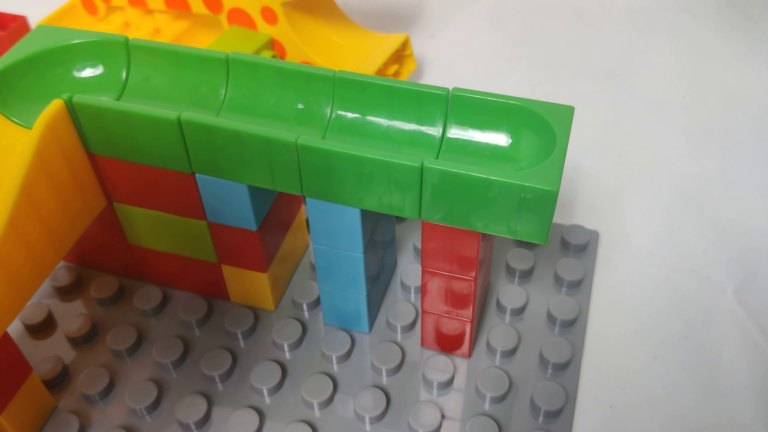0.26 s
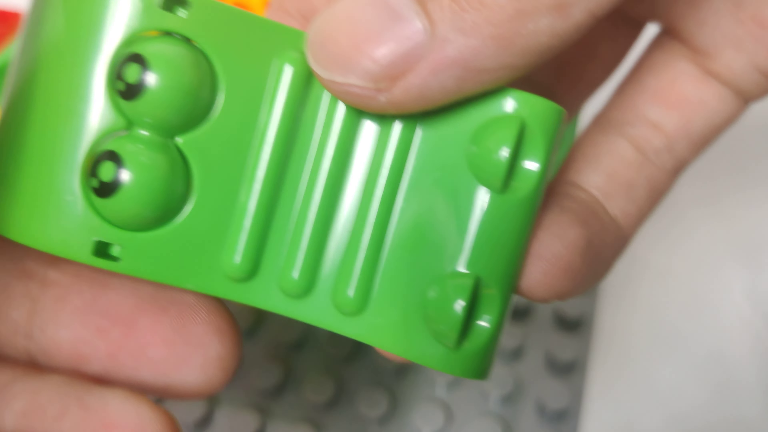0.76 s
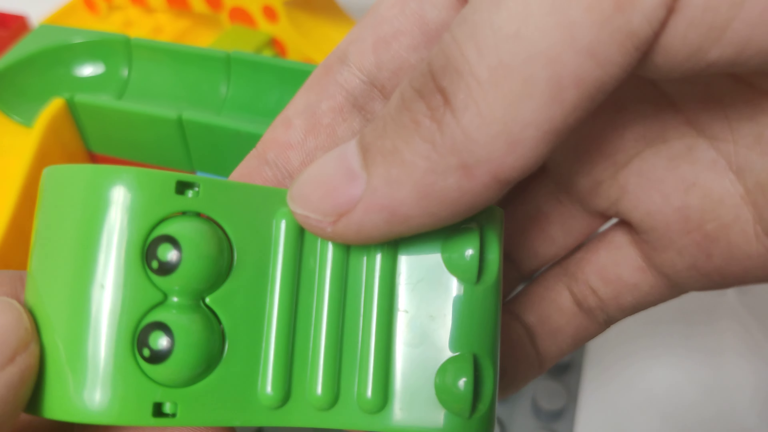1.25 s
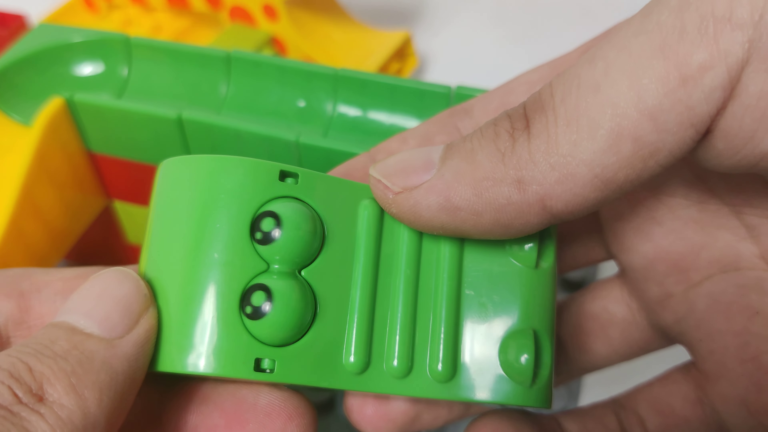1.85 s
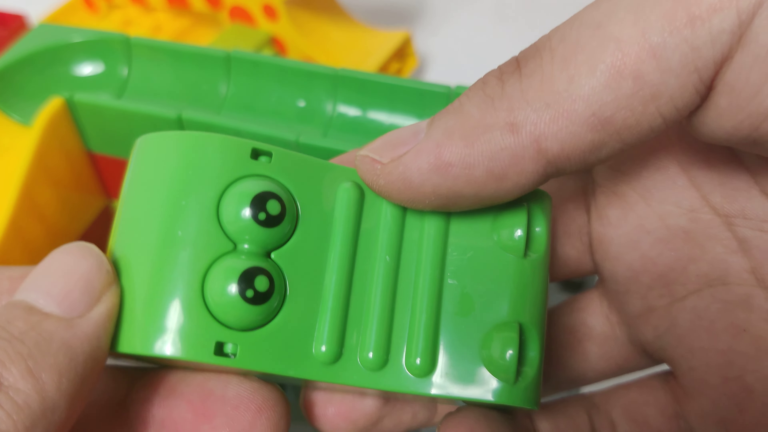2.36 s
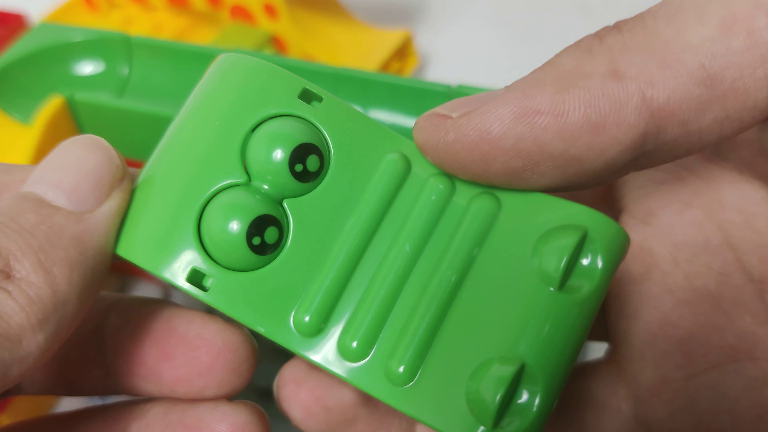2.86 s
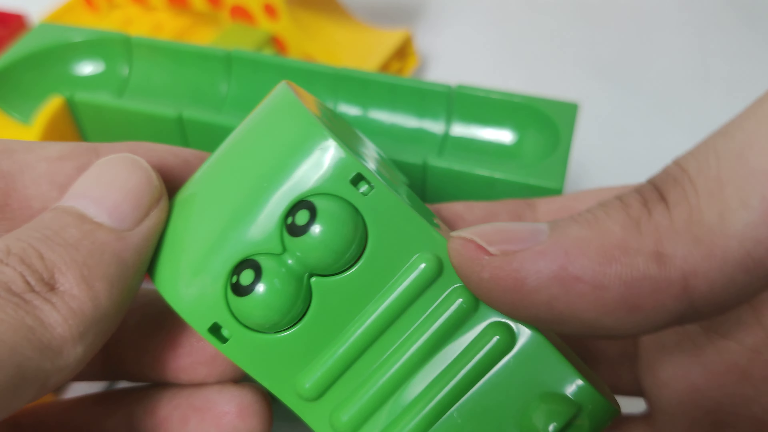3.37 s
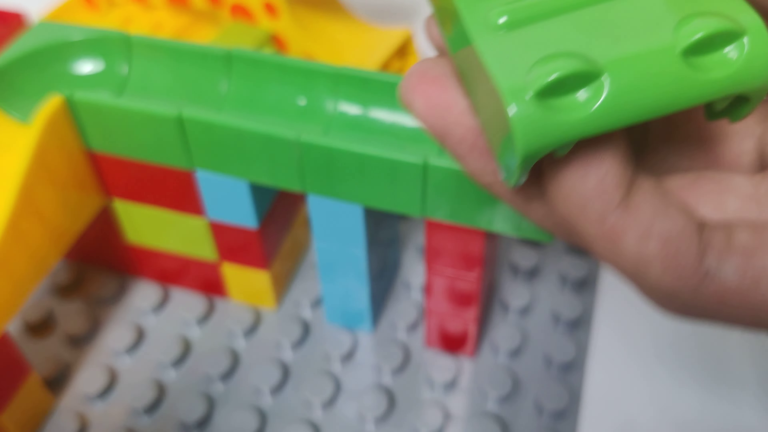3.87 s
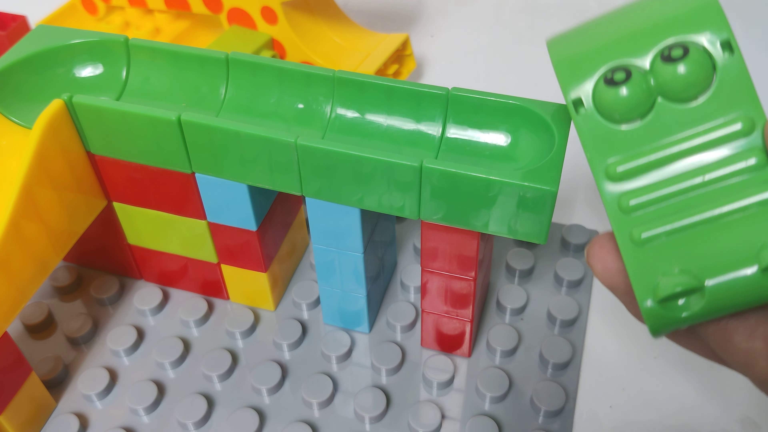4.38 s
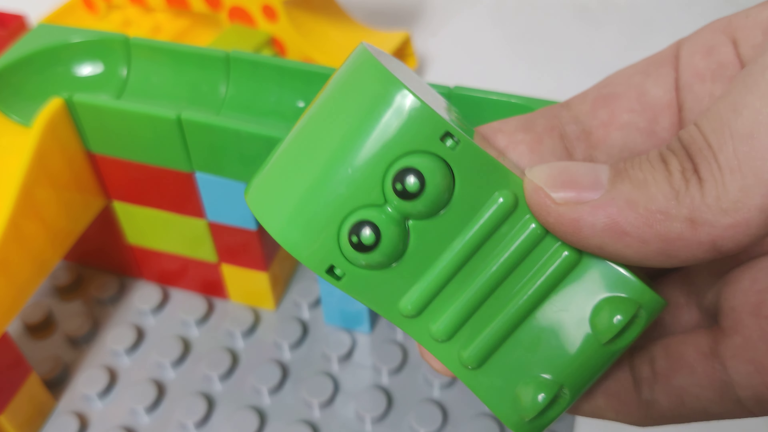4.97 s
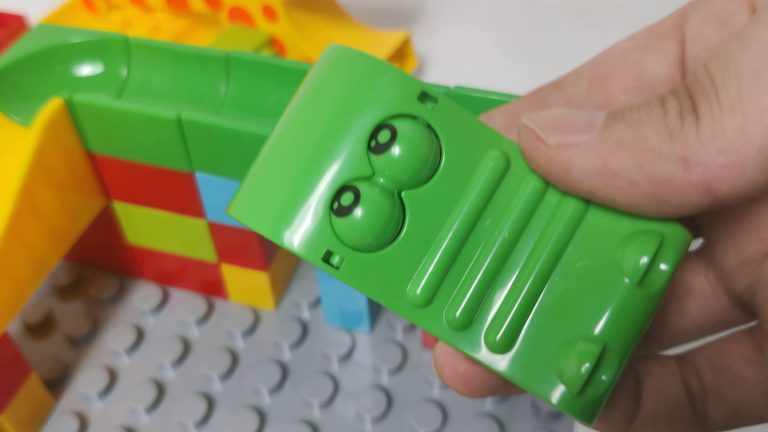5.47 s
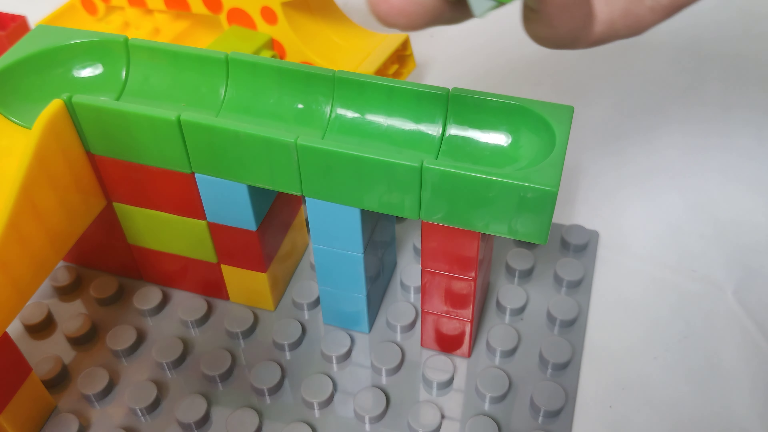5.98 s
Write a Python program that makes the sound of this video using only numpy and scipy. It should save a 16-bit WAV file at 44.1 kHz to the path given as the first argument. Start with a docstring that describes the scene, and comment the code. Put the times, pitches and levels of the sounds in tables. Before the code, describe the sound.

Light plastic ticks, clacks and short skids come in irregular clusters over soft fingertip rubs and a very quiet low room hum.

```python
"""Plastic blocks in a hard room

Hands turn a hollow plastic toy piece and try it against a track of building blocks. Edges tick and skid:
stick-slip jerks excite the damped modes of the thin shell. Fingertips rub it as grains of filtered noise;
nudges of the table are damped low swings. A small hard room, made of decaying noise, answers the sounds
over a faint hum and rumble."""
import sys
import numpy as np
from scipy import signal
from scipy.fft import rfft, irfft
from scipy.io import wavfile
from scipy.ndimage import uniform_filter1d

SR = 44100
rng = np.random.default_rng(int(sys.argv[2]) if len(sys.argv) > 2 else 0)


def transcribe(signal):
    """Save signal, clipped to [-1, 1], as a 16-bit WAV file at the path in sys.argv[1]."""
    frames = np.atleast_2d(signal).T
    limited = np.clip(frames, -1, 1)
    pcm = np.round(limited * 32767).astype(np.int16)
    wavfile.write(sys.argv[1], SR, pcm)


N = 274743  # samples


def gain_of(db):
    """Decibel law: level to amplitude."""
    return 10 ** (np.asarray(db) / 20)


def evened(x):
    """Normalisation of power: scales to rms 1."""
    return x / np.sqrt(np.mean(x ** 2) + 1e-20)


def read(points, hz):
    """Interpolation on a logarithmic frequency axis."""
    f, value = np.transpose(points)
    return np.interp(np.log(hz + 1), np.log(f + 1), value)


def coloured(x, points):
    """Linear filtering: multiplies the spectrum of x by the gains of the points (f/Hz, level/dB)."""
    size = x.shape[-1]
    gain = gain_of(read(points, np.fft.rfftfreq(size, 1 / SR)))
    return irfft(rfft(x) * gain, size)


def panned(db):
    """Interaural level difference: left and right gains of mean power 1."""
    return evened(gain_of([[db / 2], [-db / 2]]))


def add(mix, s, sound):
    """Superposition: mixes a sound of several channels in at time s."""
    part = mix[:, max(round(s * SR), 0):][:, :sound.shape[1]]
    part += sound[:, :part.shape[1]]


# spectrum of the room air: f/Hz, relative level/dB
AIR_SPECTRUM = [(20, 0.5), (45, -3.5), (70, -7.5), (110, -11.5), (180, -15), (260, -16), (400, -19.5),
                (700, -24), (1500, -26.5), (3000, -27.5), (6000, -28), (8000, -36), (12000, -35),
                (16000, -37.5)]
# correlation of the air noise between left and right: f/Hz, likeness
AIR_LIKENESS = [(30, 0.68), (150, 0.52), (400, 0.32), (1000, 0.07), (4000, 0.0336)]
# partials of the appliance hum: f/Hz, level/dB
HUM_PARTIALS = [(47, -69), (139.5, -71), (231, -79)]
AIR_DB = -58.5


def background(waver=0.55, left_db=1.0):
    """Partly coherent noise, most alike in both ears in the bass, and the wavering hum of some appliance."""
    a, b = rfft(rng.standard_normal((2, N)))
    same = np.clip(read(AIR_LIKENESS, np.fft.rfftfreq(N, 1 / SR)), -1, 1)
    right = same * a + np.sqrt(1 - same ** 2) * b
    air = evened(coloured(irfft(np.array([a, right]), N), AIR_SPECTRUM))
    t = np.arange(N) / SR
    knots = np.linspace(0, t[-1], 60)
    hum = 0
    for hz, db in HUM_PARTIALS:
        wander = rng.standard_normal(len(knots)) + 1j * rng.standard_normal(len(knots))
        drift = np.interp(t, knots, 1 + waver * wander)  # wavers in strength and phase
        hum = hum + gain_of(db) * evened((drift * np.exp(2j * np.pi * hz * t)).real)
    return panned(left_db) * (gain_of(AIR_DB) * air + hum)


# reverberation time of the room: f/Hz, t60/s
REVERBERATION = [(200, 0.95), (1000, 1), (3000, 0.87), (6000, 0.59), (9000, 0.55), (15000, 1)]


def room(x, gap=0.0048, early_db=16.0, early_s=0.013):
    """Diffuse reverberation: dense reflections of one direction, each band dying at its own speed."""
    hz, t, z = signal.stft(rng.standard_normal((2, SR)), SR, nperseg=256)
    decay = gain_of(-60 * t / read(REVERBERATION, hz)[:, None])
    tail = signal.istft(z * decay, SR, nperseg=256)[1]
    t = np.arange(tail.shape[1]) / SR
    onset = np.clip(t / gap - 1, 0, 1)  # silent for one gap (s), then rises over another
    tail = tail * onset * gain_of(early_db * np.exp(-t / early_s))  # early reflections are raised
    return signal.fftconvolve(x[None], tail / np.linalg.norm(tail[0]), axes=1)[:, :N]


# soft blows through the table: t/s, f/Hz, peak level/dB before panning, rise time/s, relative room share
TABLE_BLOWS = [(0.646, 45.8, -44.5, 0.019, 0.11), (1.785, 51.7, -44.5, 0.018, 0.2),
               (4.254, 239, -48.5, 0.0042, 1.24), (4.255, 375, -53, 0.0011, 2.3),
               (4.253, 670, -40, 0.00026, 1.7), (4.455, 189.7, -54, 0.0037, 0.56),
               (4.772, 50.7, -40.5, 0.0048, .1), (4.827, 41, -38, 0.024, 0.23),
               (4.84, 93, -48.5, 0.017, 0.41)]


def table(pan_db=5.0):
    """Damped oscillation of the table top; returns the swings and the part that goes to the room."""
    near, far = np.zeros((2, N)), np.zeros((2, N))
    t = np.arange(SR // 2) / SR
    for s, hz, db, rise, share in TABLE_BLOWS:
        envelope = (t / rise * np.exp(1 - t / rise)) ** 2  # peaks at 1 when t = rise
        swing = gain_of(db) * envelope * np.cos(2 * np.pi * hz * t) * panned(pan_db)
        add(near, s, swing)
        add(far, s, share * swing)
    return near, far


# fingertip strokes: t/s, length/s, level/dB before fades, wall ring/dB, rib ring/dB
RUB_STROKES = [(0.593, 0.26, -66.5, -15, 2), (0.901, 0.04, -60, 0, -1), (1.005, 0.27, -60, -10, 1.5),
               (1.379, 0.44, -64.5, -1, -2), (1.721, 0.14, -66, -5, 28), (2.107, 0.18, -65, -17, -7),
               (2.48, 0.28, -60.5, 3, 2), (2.902, 0.14, -59, 5, -3), (3.24, 0.11, -62, -18, -8),
               (3.562, 0.28, -61.5, -6, 2), (4.097, 0.22, -60.5, 3.5, -1), (4.395, 0.091, -51, 7.5, -6),
               (4.986, 0.1, -65, 0, 2), (5.234, 0.055, -55.5, 0, 1), (5.539, 0.24, -62, 2, 4),
               (5.779, 0.14, -57, 3, -2), (5.98, 0.15, -72, 0, 0)]
# spectrum of rubbed plastic: f/Hz, relative level/dB
RUB_SPECTRUM = [(200, -28.5), (1000, -12), (1900, -13.5), (2850, 2), (3400, -13), (4100, 0.5),
                (4900, -11.5), (5850, 3), (6600, -7.5), (7600, -19), (16000, -22.5)]
# the two resonances that a rubbing finger brings out; the width is to half the dB boost on each side
WALL_HZ, RIB_HZ, RING_WIDTH_HZ = 2760, 4080, 300


def fingers(grain_db=1.5, grains_per_s=4000, pan_db=3.0, uneven_db=3.0, uneven_s=0.015):
    """Granular friction: skin catches in many small grains under an uneven pressure, fading at both ends."""
    out = np.zeros((2, N))
    for s, length, db, wall_db, rib_db in RUB_STROKES:
        size = round(length * SR)
        grain_gain = gain_of(grain_db * np.minimum(rng.exponential(1, SR), 5))
        grains = grain_gain * (rng.random(SR) < grains_per_s / SR)
        unevenness = uniform_filter1d(rng.standard_normal(SR), round(uneven_s * SR))
        pressure = gain_of(uneven_db * evened(unevenness))
        catches = (pressure * grains * rng.standard_normal((2, SR)))[:, :size]
        hz = np.fft.rfftfreq(size, 1 / SR)
        wall, rib = (1 / (1 + ((hz - centre) / RING_WIDTH_HZ) ** 2) for centre in (WALL_HZ, RIB_HZ))
        colour = gain_of(read(RUB_SPECTRUM, hz) + wall_db * wall + rib_db * rib)
        hiss = evened(irfft(rfft(catches) * colour, size))
        add(out, s, gain_of(db) * panned(pan_db) * hiss * signal.windows.tukey(size, .5))
    return out


# stray ticks of the piece shifting in the grip: level above the rubbing, its spread, depth, spread of colour
STRAY_OVER_DB, STRAY_SPREAD_DB, STRAY_DEPTH_DB, STRAY_COLOUR_DB = 5, 1.5, 2.5, 3


def strays(count=17, skid_s=0.00164, pan_db=7.5):
    """Random point process: faint contacts while the fingers slide; rows as in EDGE_CONTACTS."""
    start, length, db = np.transpose(RUB_STROKES)[:3, np.arange(count) % len(RUB_STROKES)]
    moment = start + length * rng.random(count)
    rows = []
    for s, rub_db, (force, deep, hard) in zip(moment, db, rng.standard_normal((count, 3))):
        level_db = rub_db + STRAY_OVER_DB + STRAY_SPREAD_DB * force
        depth_db = STRAY_DEPTH_DB + STRAY_COLOUR_DB * deep
        rows.append((s, skid_s, level_db, pan_db, depth_db, STRAY_COLOUR_DB * hard))
    return rows


# modes of the plastic shell, before detuning and spot: f/Hz, relative level/dB, t60/s
SHELL_MODES = [(1252, -11.5, 0.013), (2210, -15, 0.0066), (2520, -9, 0.021), (2941, 2, 0.02),
               (3713, -1.5, 0.019), (4110, 3, 0.022), (4590, -9.5, 0.017), (5720, 8, .022),
               (5956, 10, 0.016), (6350, -4, 0.037), (8040, -12, 0.0079), (9530, -27, 0.0091)]
# dense, quickly damped modes between them: f/Hz, relative level/dB
CLATTER_SPECTRUM = [(150, -38.5), (500, -24), (850, -13), (1250, -26), (1620, -19.5), (2150, -12),
                    (3200, -3.5), (4800, -6.5), (5800, 12.5), (6700, -9), (7600, -16), (10000, -22),
                    (11500, -29), (16000, -37)]
DIRECTIONS = 6  # two microphones and four paths towards the walls


def shell(t, clatter_t60=0.024, snap_db=9.5, snap_s=0.00033, spot_db=3.5, grip=0.0088, rise=0.00029):
    """Modal superposition: the piece's answer to one snap, microphones first, then towards the walls."""
    hz, db, t60 = np.transpose(SHELL_MODES)[:, :, None]
    hz = hz * (1 + grip * rng.standard_normal(hz.shape))  # the grip detunes the modes
    db = db + spot_db * rng.standard_normal(db.shape)  # each spot favours other modes
    facing = np.exp(2j * np.pi * rng.random((DIRECTIONS, len(SHELL_MODES))))  # phase by direction
    modes = gain_of(db - 60 * t / t60) * np.exp(2j * np.pi * hz * t)
    ring = (facing @ modes).real
    clatter = coloured(rng.standard_normal((DIRECTIONS, len(t))), CLATTER_SPECTRUM)
    clatter *= gain_of(snap_db * np.exp(-t / snap_s) - 60 * t / clatter_t60)  # extra level at the snap
    return (evened(ring) + evened(clatter)) * (1 - np.exp(-t / rise))


LEAD_S = .002  # room before the contact for the two-way filters


def contact(bands, skid, level_db, colour_db, slips_per_s=2500, slip_size=0.67, catch_s=0.033):
    """Stick-slip excitation: an edge catches, then slips in jerks; its place sets each register's level."""
    t = np.arange(2048) / SR
    pressure = np.sin(np.pi * np.minimum(t / max(skid, 1 / SR), 1))
    slips = rng.standard_normal(len(t)) * (rng.random(len(t)) < slips_per_s / SR)
    jerks = slip_size * pressure * slips
    jerks[0] = np.exp(-skid / catch_s)  # a long, glancing skid starts softly
    jerks = np.roll(jerks, round(LEAD_S * SR))
    sound = signal.fftconvolve(shell(t), jerks[None], axes=1)[:, :len(t)]
    out = 0
    for band, db in zip(bands, colour_db):
        out = out + gain_of(db) * evened(signal.sosfiltfilt(band, sound, padtype=None))
    energy = (out ** 2).sum(1, keepdims=True)
    return gain_of(level_db) * out * np.sqrt(SR / 100 / energy)  # level refers to 10 ms


# edges of plastic meeting: t/s, skid length/s, level/dB over 10 ms before panning, left-right/dB,
# depth/dB (how much the hollow body joins the high ring), hardness/dB (sharp corner rather than flat face)
EDGE_CONTACTS = [(0.0418, 0.0011, -29, 12, -6, 2.5), (0.0505, 0.0087, -28.5, 2, -1, 12),
                 (0.0594, 0.0054, -32, 14, -6.5, 4), (.074, 0.00088, -46, 15, -2, -2),
                 (0.1875, 0.00088, -49, 12, 3, 9), (0.223, .001, -53, 14, 0, 11),
                 (0.2794, 0.00091, -41, 15, -0.5, 15), (.332, 0.0048, -42, 17, -1, -2.5),
                 (0.3555, 0.0011, -42.5, 13, 1, 8), (.653, 0.0094, -43.5, 12, -4, 7),
                 (.664, 0.0089, -45, 6, 0.5, -1), (.6841, .001, -48.5, 18, 6, -3.5),
                 (0.8036, 0.00079, -51, 14, -10, -4), (1.211, 0.0014, -46.5, 0.5, 1, -1),
                 (1.379, 0.0077, -46.5, 3, -2.5, 0), (1.3888, .005, -36.5, 2.5, -0.5, 2),
                 (1.489, .001, -47, -0.5, 4, 0.5), (1.5622, 0.0013, -33.5, 3.5, 3.5, -2.5),
                 (1.6398, 0.0012, -48, 1, 9, 8), (1.702, 0.011, -35, 2.5, 3, 1.5),
                 (1.8704, 0.0026, -31.5, 0.5, -1.5, 3.5), (1.8965, .001, -25.5, 2.5, -7, -1.5),
                 (1.9231, .001, -42, 3, -0.5, -1), (2.1316, .002, -34.5, 3, -4.5, 1.5),
                 (2.466, 0.01, -53.5, 4, 13, -4), (2.564, 0.0014, -48.5, 2, 5, 4.5),
                 (2.962, 0.0012, -49.5, 3, 8, -3), (3.0157, 0.0011, -47.5, 16, 1, -17),
                 (3.0285, 0.0014, -42.5, 5, -5, 2), (3.051, 0.0012, -38.5, 8, 1, -6.5),
                 (3.0675, 0.0012, -37, 5, 2, -11), (3.0836, .0017, -20.5, 3, -9.5, -3.5),
                 (3.0938, 0.0023, -37.5, 8, -4, -6), (3.1971, .001, -51, 2, 6, 0),
                 (3.4536, 0.00077, -42.5, 2, 3, -6), (3.471, 0.011, -41, 6, 3.5, -8.5),
                 (3.4795, 0.0094, -27.5, 0, -9.5, 1.5), (3.759, 0.0009, -48, 1, -6, -4),
                 (3.859, 0.0055, -36.5, -0.5, -6, -6), (3.8723, .003, -46.5, -4, 4, 4),
                 (4.2535, 0.0011, -33, 5.5, 15, -2), (4.3925, .001, -35.5, -4.5, -1, 5),
                 (4.449, 0.0023, -44, -2, 6, -1), (4.458, .004, -40.5, -1, 7, 1.5),
                 (4.7742, 0.0012, -40.5, 1.5, 2, -2.5), (4.795, 0.0058, -38, 2, 7, 2),
                 (4.8217, .001, -36.5, 3, 7.5, -2), (4.958, .001, -43, 3, 4, -1),
                 (5.068, 0.0012, -27.5, 4.5, -5.5, -1), (5.0816, .001, -30.5, 5, -2, 0),
                 (5.129, 0.002, -32.5, 2.5, 2, -3.5), (5.2392, 0.0011, -42, 7, -5, -1.5),
                 (5.262, .001, -44.5, 7, -6, -0.5), (5.552, 0.012, -37, 3, 10, 2),
                 (5.6858, 0.00092, -39.5, 2, 10, 0), (5.708, .012, -47, 1, 11, 3),
                 (5.753, 0.014, -51, 3, 9, 2), (5.893, .001, -44, 3, -2, -2.5),
                 (5.9346, 0.00086, -44.5, 5, 10, 4), (5.9402, .001, -36.5, 3, -9, 1),
                 (6.061, .001, -57.5, 5, 3, -3), (6.119, 0.0012, -56.5, 6, 5, -2)]
# edges between the registers of the piece: f/Hz
REGISTER_EDGES = [400, 1650, 2600, 3400, 5000, 7200, 16000]
# hollow knock, body, wall ring, rib ring, shell ring, edge crack: relative level/dB, then dB gained
# per dB of depth, of hardness and of level above a middling tap; a stronger blow cracks more
REGISTER_LEVELS = [(-17.5, 1.22, -0.14, -0.18), (-9, 0.93, -0.86, 0.086), (-3, 1.21, 0.27, 0.067),
                   (-1.5, 0.57, 0.99, -0.078), (0.5, 0.014, 0.14, -0.021), (-16, 0.66, 1, 0.23)]
MIDDLING_DB = -37


def blocks():
    """Impact and friction of plastic on plastic, at the microphones and towards the walls."""
    edge_pairs = zip(REGISTER_EDGES, REGISTER_EDGES[1:])
    bands = [signal.butter(5, edges, "band", fs=SR, output="sos") for edges in edge_pairs]
    near, far = np.zeros((2, N)), np.zeros((DIRECTIONS - 2, N))
    for s, skid, db, pan_db, depth_db, hardness_db in EDGE_CONTACTS + strays():
        colour_db = np.array(REGISTER_LEVELS) @ [1, depth_db, hardness_db, db - MIDDLING_DB]
        sound = contact(bands, skid, db, colour_db)
        add(near, s - LEAD_S, panned(pan_db) * sound[:2])
        add(far, s - LEAD_S, sound[2:])
    return near, far


def scene(room_db=-12.5, boom_db=3.0):
    """Superposition of direct sound, reverberation and background."""
    clicks, outward = blocks()
    rubs = fingers()
    thumps, boom = table()
    sent = gain_of(room_db) * (outward + rubs.mean(0)) + gain_of(boom_db) * boom.mean(0)
    echo = sum(room(x) for x in sent) / np.sqrt(len(sent))
    return clicks + rubs + thumps + echo + background()


EDGE_HZ = 15700  # upper band limit


def record(dry, treble_db=1.0):
    """Linear filtering: treble tilted down on the left and up on the right, then a low-pass band limit."""
    tilts = [[(5500, 0.001), (8000, side * treble_db)] for side in (-1, 1)]
    ports = np.array([coloured(x, tilt) for x, tilt in zip(dry, tilts)])
    lowpass = signal.firwin(511, EDGE_HZ, window=("kaiser", 9), fs=SR)
    return signal.oaconvolve(ports, lowpass[None], "same")


dry = scene()
out = record(dry)
transcribe(out)
```